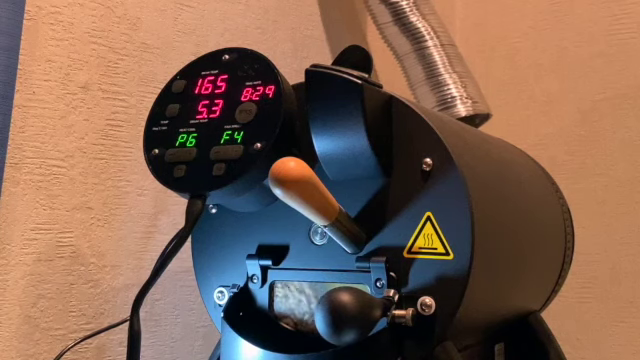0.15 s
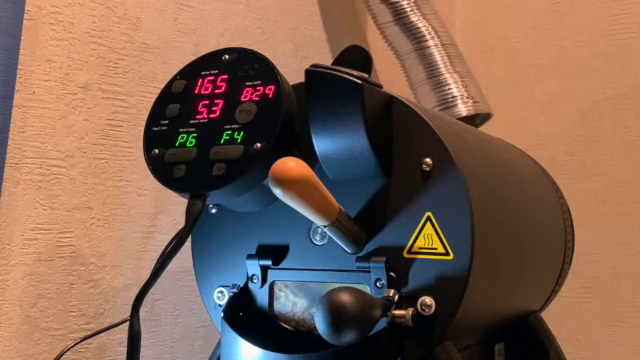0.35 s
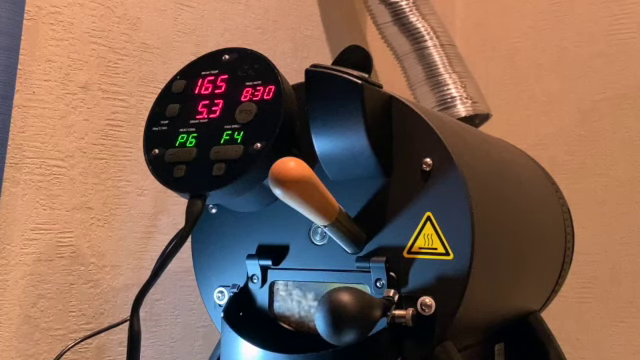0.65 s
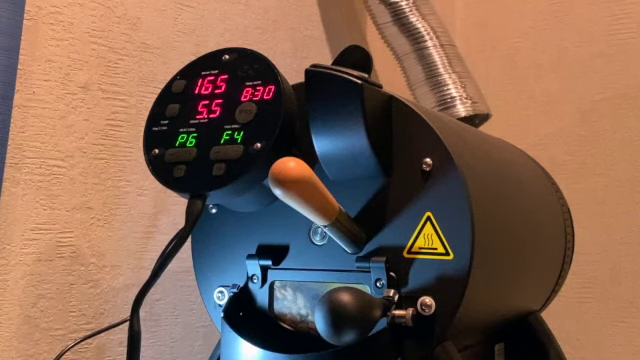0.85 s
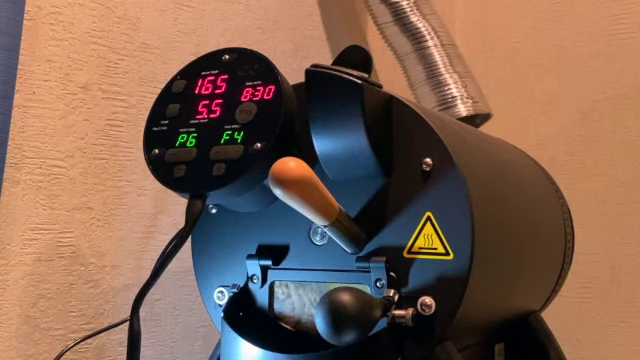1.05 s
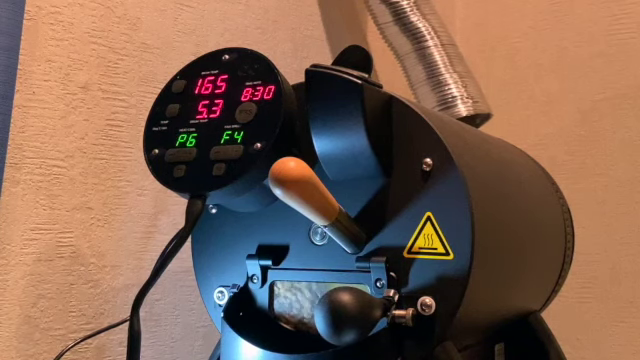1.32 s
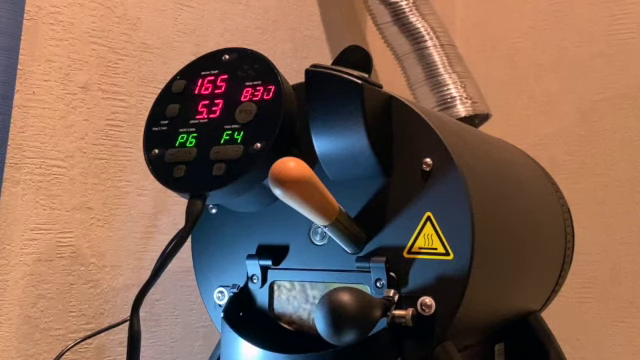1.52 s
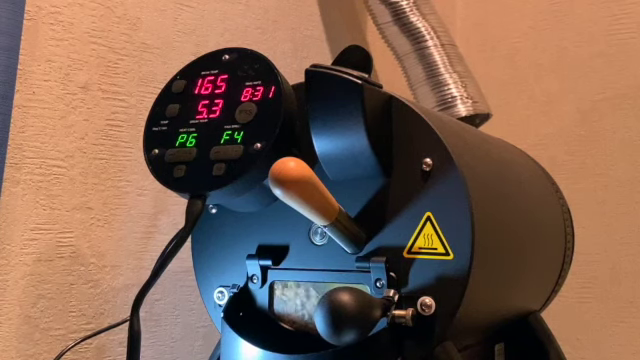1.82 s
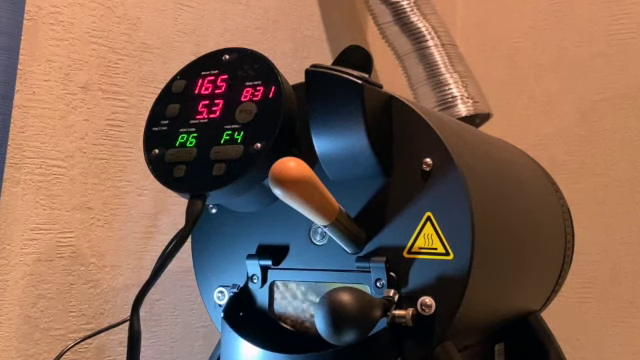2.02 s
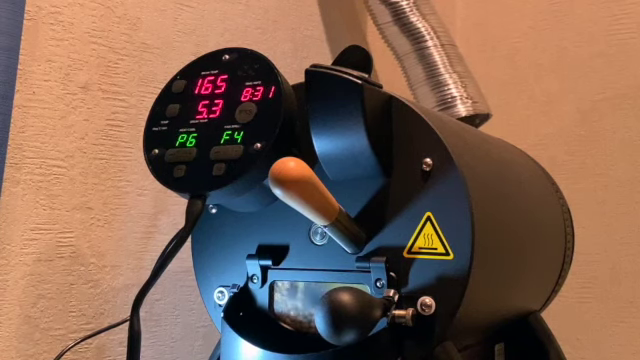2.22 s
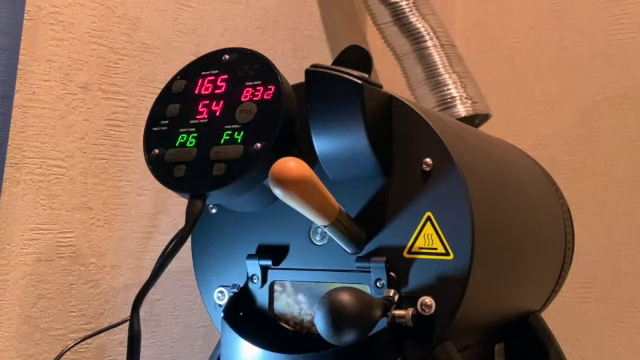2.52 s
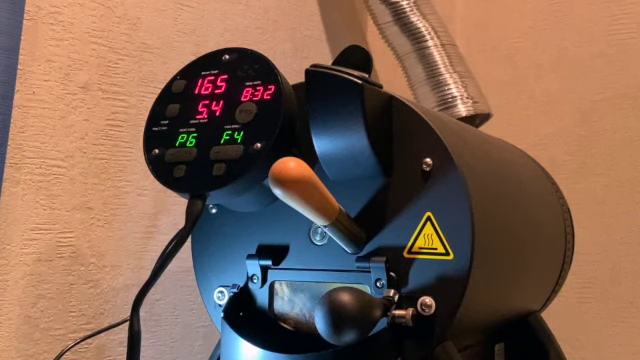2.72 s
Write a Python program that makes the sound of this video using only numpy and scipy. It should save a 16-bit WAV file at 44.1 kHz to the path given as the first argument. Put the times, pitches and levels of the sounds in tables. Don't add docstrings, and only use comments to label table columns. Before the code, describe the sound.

Small drum coffee roaster running continuously indoors, heard close in stereo: dense bean rattle surges and thins rhythmically, panels ring faintly, occasional low bearing thumps knock beneath constant fan roar, casing hum and thin rotor whine.

```python
import sys
import numpy as np
from scipy import signal
from scipy.fft import rfft, irfft
from scipy.io import wavfile

SR = 44100
rng = np.random.default_rng(int(sys.argv[2]) if len(sys.argv) > 2 else 0)


def file_out(sig):
    cols = np.atleast_2d(sig).T
    lim = np.clip(cols, -1, 1)
    pcm = np.round(lim * 32767).astype(np.int16)
    wavfile.write(sys.argv[1], SR, pcm)


def how_loud(loudness_db):
    steps = np.asarray(loudness_db, float) / 20
    return 10 ** steps


N = 126126

# thickest_s, fall_db, slide_db (the slide rings the low shell)
VANE_POURS = [(-.1, 2.5, -1), (0.172, 0.9, 0.5), (0.448, -0.05, 3.5), (0.712, 0.2, -1.5), (.99, 0.46, 1.5),
              (1.26, 0.3, 4), (1.54, 0.8, 0), (1.81, -0.26, 2), (2.085, 0.26, 3), (2.34, 1.35, -2.5),
              (2.62, 0.8, 0.5), (2.88, -0.6, 5)]
# pitch_hz, density_db (per Hz)
RATTLE_COLOUR = [(760, -46), (1300, -18), (1470, -12.5), (1740, -4.5), (2110, -8), (2970, -10),
                 (3770, -6.5), (6760, -2), (8200, -11), (10700, -29), (18000, -120)]
# pitch_hz, density_db (per Hz)
TICK_COLOUR = [(6500, -28), (8200, -17.5), (9070, -2), (10800, 4), (12600, -7.5), (13300, -15),
               (14600, -19), (15700, -12)]
# pitch_hz, density_db (per Hz)
TICK_SIDE_COLOUR = [(7850, -45), (8050, -4.5), (8550, -2.5), (10100, -10), (10900, -21), (12300, -7.5),
                    (14200, -14), (14900, -30)]
# pitch_hz, width_hz, level_db
LOW_SHELL_MODES = [(1619, 35, -43), (1720, 14, -44.5), (1747, 21, -49), (1771, 14, -43), (1811, 9.1, -45),
                   (1962, 66, -44.5)]
# pitch_hz, width_hz, level_db
UPPER_MODES = [(2210, 14, -50), (2456, 14.5, -46), (2663, 89, -41.5), (3029, 57, -38),
               (3250, 16, -43.5), (3453, 39, -43), (3976, 24, -43.5), (4288, 44, -41),
               (4976, 66, -37), (5180, 43, -43), (5380, 48, -43.5), (5693, 79, -37.5),
               (5790, 57, -46), (6420, 50, -50),
               (6660, 40, -49), (6770, 58, -37), (6980, 60, -48.5), (7160, 54, -40)]
# peak_s, pitch_hz, level_db, half_length_s
PANEL_PINGS = [(.15, 1760, -35, .04), (.335, 2432, -35, .035), (.38, 1712, -31, .07),
               (.71, 3039, -33, .035), (.76, 2222, -37, .035), (.79, 1380, -41, .04), (.90, 2625, -36, .04),
               (1.14, 1718, -33, .05), (1.16, 2432, -39, .035), (1.28, 3456, -36, .035),
               (1.45, 1742, -31, .035), (1.55, 3055, -33, .04), (1.80, 3032, -32, .035),
               (1.965, 2433, -34, .035), (1.99, 1711, -29, .065), (2.37, 2222, -40, .035),
               (2.43, 1380, -41, .05), (2.80, 1716, -32, .06)]
# start_s, pitch_hz, level_db
BEARING_JOLTS = [
    (0.271, 111, -35),
    (1.09, 98, -23.5),
    (1.28, 60, -31),
    (1.571, 74, -31.5),
    (1.782, 102, -25),
    (2.402, 131, -48),
]
# pitch_hz, density_db (per Hz)
ROAR_COLOUR = [(22, -29), (38, -1), (209, -7), (256, -10), (561, -14.5), (791, -11), (856, -8.5),
               (1130, -13), (1600, -13.5), (2080, -28), (3520, -120)]
# pitch_hz, density_db (per Hz)
ROAR_SIDE_COLOUR = [(24, -47), (40, -12), (118, -21.5), (387, -15.5), (775, -8.5), (863, -4.5),
                    (976, -13.5), (1370, -17.5), (1600, -84), (2080, -114), (3520, -120)]
# pitch_hz, width_hz, level_db, left_right_db
CASING_HUMS = [(45.74, 0.36, -42.5, -1.5), (63.85, 2.6, -43.5, 0.5), (99.6, 10, -49, -3),
               (138.6, 3.4, -47.5, -6.5), (255.1, 1.9, -47, -1.5), (290.6, 5, -57.5, -4),
               (183.7, 5.2, -51.5, -4), (332.8, 6, -50, 0.5), (383.5, 5, -52.5, 2), (506.5, 13, -53.5, -3),
               (618, 3, -54.5, -5)]
# rotor_multiple (of rotor speed), width_hz, level_db, left_right_db
BLADE_WHINE = [(15.025, 4.8, -43, -28), (14.76, 6.9, -55, -9), (15.99, 3.3, -49, -9),
               (29.92, 3.8, -43.5, 0.5), (30.96, 6, -45, 0.5)]

BEANS_PER_S, SIZE_SPREAD_DB = 9000, 2.32
RISE_S, FALL_S = 0.07, 0.049
FALL_ROLL_DB, TICK_ROLL_DB, SLIDE_ROLL_DB = -8.5, -7, 0
SLIDE_LEAD_S, SLIDE_S, TICK_LAG_S = .06, .07, .015
RATTLE_DB, TICK_DB, TICK_STEADY_DB = -28.5, -40.5, -12
TICK_SIDE_DB, TICK_SIDE_LINK = -42, 0.78
RATTLE_SIDE_DB, RATTLE_SIDE_HZ, RATTLE_SIDE_WIDTH_HZ = -50.5, 2860, 860
CLUMP_DB, PATCH_DB, SIDE_PATCH_DB = .5, 2.17, 1
JOLT_T60_S, JOLT_ATTACK_S = .2, 0.0076
ROTOR_HZ, ROAR_DB, ROAR_SIDE_DB = 57.36, -36.5, -43.5
LOW_CUT_HZ, TOP_CUT_HZ = 38, 15720


def rms_one(x):
    return x / np.sqrt(np.mean(x ** 2) + 1e-20)


def drift(corner_hz):
    r = np.exp(-80 * np.pi * corner_hz / SR)
    noise = rng.standard_normal(N // 40 + 2002)
    slow = signal.lfilter([1], [1, -2 * r, r * r], noise)[2000:]
    slow = rms_one(slow - slow.mean())
    return np.interp(np.arange(N) / 40, np.arange(len(slow)), slow)


def colour(x, points, turn=1):
    hz = np.fft.rfftfreq(N, 1 / SR) + 1
    at_hz, db = np.transpose(points)
    octaves_outside = np.maximum(np.log2(at_hz[0] / hz), 0) + np.maximum(np.log2(hz / at_hz[-1]), 0)
    shape_db = np.interp(np.log(hz), np.log(at_hz), db) - 40 * octaves_outside
    return rms_one(irfft(rfft(x) * turn * how_loud(shape_db), N))


def ring(x, hz, width_hz):
    r = np.exp(-np.pi * width_hz / SR)
    primed = np.r_[x[-SR // 10:], x] + 1e-18
    run = signal.lfilter([1, 0, -1], [1, -2 * r * np.cos(2 * np.pi * hz / SR), r * r], primed)
    return rms_one(run[-N:])


def flow(column, lead_s, rise_s, fall_s, roll_db):
    pours = np.array(VANE_POURS)
    ago = np.arange(N)[None] / SR - pours[:, :1] + lead_s
    bells = np.exp(-.5 * (ago / np.where(ago < 0, rise_s, fall_s)) ** 2)
    bells = how_loud(pours[:, column, None]) ** 2 * bells
    power = bells.sum(axis=0) + how_loud(roll_db) ** 2
    power = power * how_loud(CLUMP_DB * drift(14)) ** 2
    return power / power.mean()


def impacts(power, per_s):
    sizes = how_loud(SIZE_SPREAD_DB * np.minimum(rng.exponential(1, N), 5)) * rng.choice([-1, 1], N)
    hits = rng.random(N) < per_s * np.sqrt(power) / SR
    return sizes * hits * power ** .25


def modes(clicks, table):
    out = np.zeros(N)
    for hz, width_hz, db in table:
        strikes = clicks * rng.standard_normal(N) * how_loud(PATCH_DB * drift(8.3))
        out += how_loud(db) * ring(strikes, hz, width_hz)
    return out


def beans():
    fall = flow(1, 0, RISE_S, FALL_S, FALL_ROLL_DB)
    slide = flow(2, SLIDE_LEAD_S, SLIDE_S, SLIDE_S, SLIDE_ROLL_DB)
    late = flow(1, -TICK_LAG_S, RISE_S, FALL_S, TICK_ROLL_DB)
    clicks = impacts(fall, BEANS_PER_S)
    others = impacts(fall, 1.5 * BEANS_PER_S)
    bright = rms_one(impacts(late, 1.5 * BEANS_PER_S))
    bright = bright + how_loud(TICK_STEADY_DB) * rng.standard_normal(N)

    mid = how_loud(RATTLE_DB) * colour(clicks, RATTLE_COLOUR) + how_loud(TICK_DB) * colour(bright, TICK_COLOUR)
    mid += modes(clicks, UPPER_MODES)
    mid += modes(impacts(slide, BEANS_PER_S), LOW_SHELL_MODES)

    ticks = TICK_SIDE_LINK * colour(bright, TICK_SIDE_COLOUR, turn=1j)
    ticks += np.sqrt(1 - TICK_SIDE_LINK ** 2) * colour(others, TICK_SIDE_COLOUR)
    rattle = ring(others, RATTLE_SIDE_HZ, RATTLE_SIDE_WIDTH_HZ)
    rattle = ring(rattle, RATTLE_SIDE_HZ, RATTLE_SIDE_WIDTH_HZ)
    side = how_loud(TICK_SIDE_DB + drift(2.1)) * ticks
    side += how_loud(RATTLE_SIDE_DB + SIDE_PATCH_DB * drift(3.4)) * rattle
    return mid, side


def panel_pings():
    t = np.arange(N) / SR
    out = np.zeros(N)
    for peak_s, hz, db, half_s in PANEL_PINGS:
        swell = how_loud(db + 1.3 * drift(33)) * np.exp(-.5 * ((t - peak_s) / half_s) ** 2)
        out += swell * np.sin(2 * np.pi * hz * t + .35 * drift(11))
    return out


def bearing_jolts():
    out = np.zeros(N)
    for start_s, hz, db in BEARING_JOLTS:
        ago = np.maximum(np.arange(N) / SR - start_s, 0)
        envelope = how_loud(db - 60 * ago / JOLT_T60_S) * (1 - np.exp(-ago / JOLT_ATTACK_S))
        out += envelope * np.sin(2 * np.pi * hz * ago + rng.uniform(0, 7.1))
    return out


def tones(table, unit_hz):
    out = np.zeros((2, N))
    for multiple, width, db, pan_db in table:
        hz = multiple * unit_hz
        peak = [(hz - 3 * width, -60), (hz - width, -14), (hz, 0), (hz + width, -14), (hz + 3 * width, -60)]
        z = signal.hilbert(colour(rng.standard_normal(N), peak))
        even = rms_one((z / (np.abs(z) + 0.21) ** 0.78).real)
        pan = how_loud(np.array([[.5], [-.5]]) * pan_db)
        out += how_loud(db) * pan / pan.mean() * even
    return out


def fan():
    mid = how_loud(ROAR_DB + 0.92 * drift(5)) * colour(rng.standard_normal(N), ROAR_COLOUR)
    side = how_loud(ROAR_SIDE_DB) * colour(rng.standard_normal(N), ROAR_SIDE_COLOUR)
    roar = np.array([mid + side, mid - side]) * how_loud(np.array([[-.4], [.4]]))
    return roar + tones(CASING_HUMS, 1) + tones(BLADE_WHINE, ROTOR_HZ)


def scene():
    mid, side = beans()
    return np.array([mid + side, mid - side]) + panel_pings() + bearing_jolts() + fan()


def band_limit(x):
    return signal.sosfilt(signal.butter(12, 17030, fs=SR, output="sos"), x)


def record(dry):
    low_cut = signal.butter(6, LOW_CUT_HZ, "high", fs=SR, output="sos")
    top_cut = signal.ellip(14, .5, 80, TOP_CUT_HZ, fs=SR, output="sos")
    mix = signal.sosfilt(top_cut, signal.sosfilt(low_cut, dry))
    return band_limit(mix)


dry = scene()
out = record(dry)
file_out(out)
```